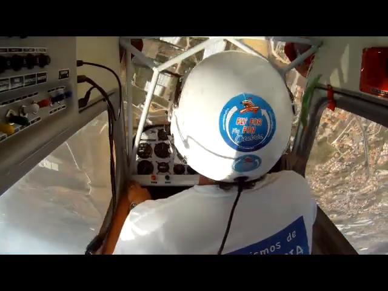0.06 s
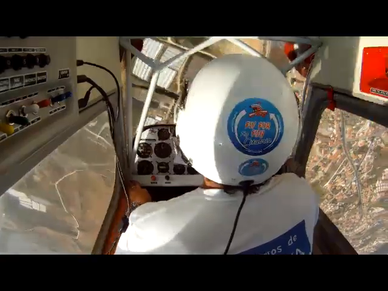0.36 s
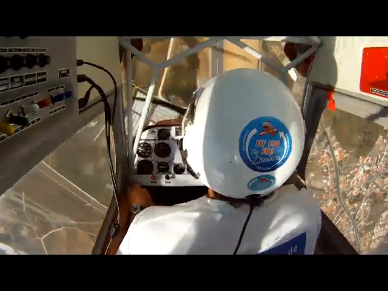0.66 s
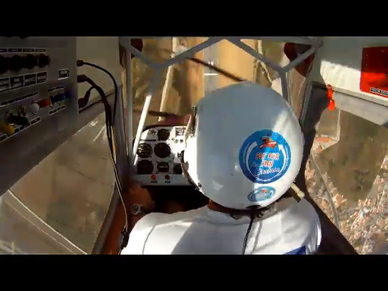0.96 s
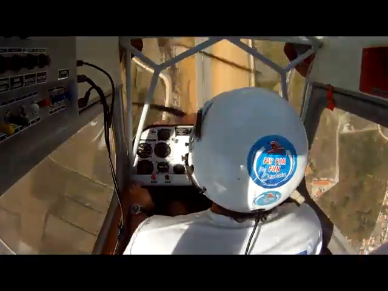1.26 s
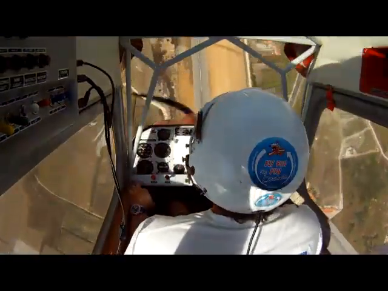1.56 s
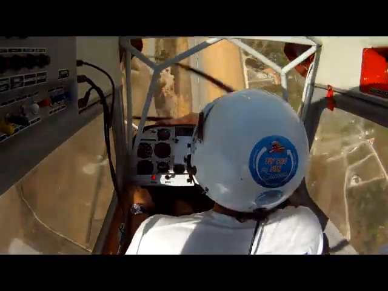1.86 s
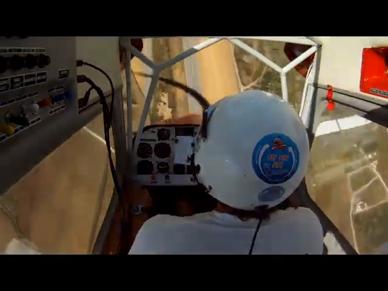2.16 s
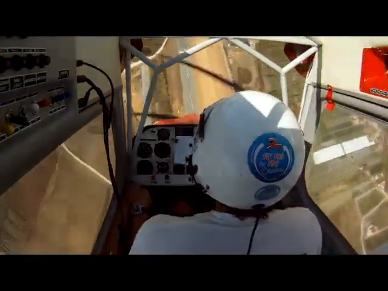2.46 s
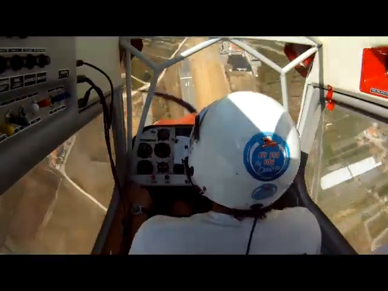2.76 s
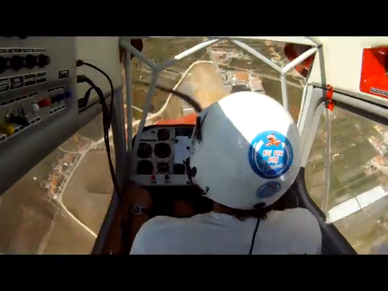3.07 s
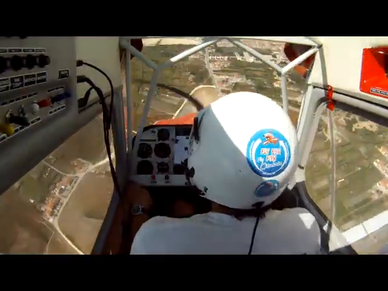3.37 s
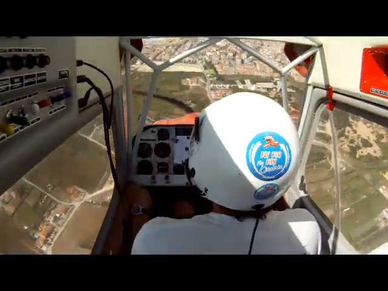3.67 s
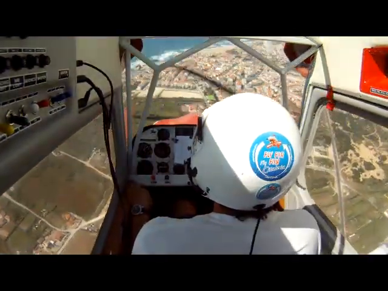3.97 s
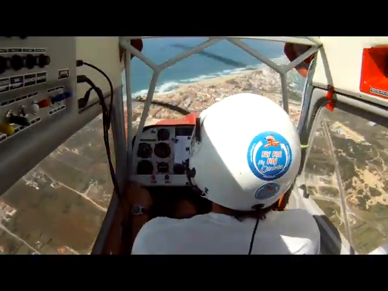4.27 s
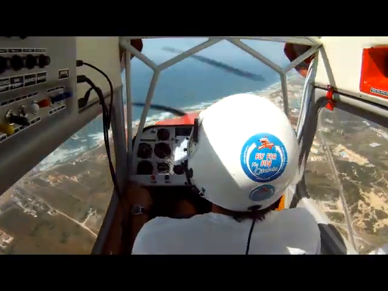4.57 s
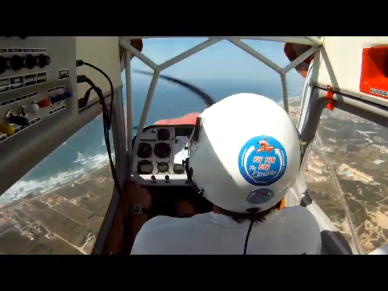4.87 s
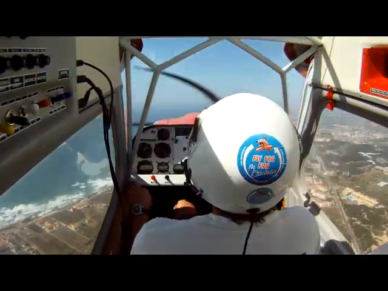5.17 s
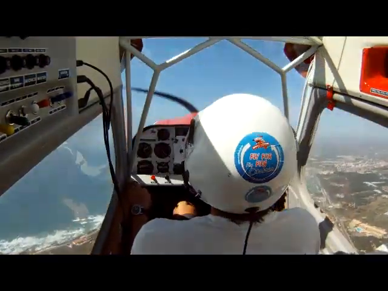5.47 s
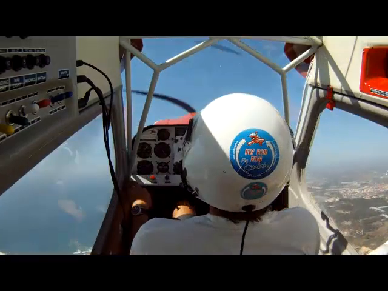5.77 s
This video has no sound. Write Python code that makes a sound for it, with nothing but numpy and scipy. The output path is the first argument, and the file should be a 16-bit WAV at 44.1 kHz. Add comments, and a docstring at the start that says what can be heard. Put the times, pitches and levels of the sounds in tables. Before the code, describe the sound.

Inside the cabin of a small plane in flight, a loud, deep propeller drone mixes with an uneven exhaust beat and a faint engine clatter. The engine gradually gains speed, so its pitch edges upward before levelling off. Wind buffets and hisses around the canopy throughout, surging lightly early on and again near the end. The sound is close, with a slight sizzle from a small camera's microphone.

```python
"""A loud propeller drone in rushing air, heard in the cockpit of a light aircraft pulling out of a dive.
A four-cylinder four-stroke turns the two-blade propeller, slowly gaining speed: blade and firing tones
sound over the uneven beat of the exhaust and a faint clatter in the cowling. The gusting slipstream
buffets the cabin and hisses through its gaps. A small camera's slow converter holds each sample,
which adds a thin sizzle on top."""
import sys
import numpy as np
from scipy import signal
from scipy.fft import rfft, irfft
from scipy.io import wavfile

SR = 44100
rng = np.random.default_rng(int(sys.argv[2]) if len(sys.argv) > 2 else 0)


def store_pcm(level_fs):
    """Save levels as 16-bit WAV."""
    pcm = np.round(np.clip(level_fs, -1, 1) * 32767).astype(np.int16)
    wavfile.write(sys.argv[1], SR, np.atleast_2d(pcm).T)


N = 260631
TIME = np.arange(N) / SR
BIN_HZ = np.maximum(np.arange(N // 2 + 1) * SR / N, 1)


def from_db(db):
    """Decibels to gain."""
    return 10 ** (np.asarray(db) / 20)

def unit_rms(x):
    """Scale to rms 1."""
    return x / np.sqrt(np.mean(x ** 2) + 1e-20)

def envelope(points):
    """Straight ramps between breakpoints, a value for every sample."""
    return np.interp(TIME, *np.transpose(points))

def equalise(x, gain):
    """Filter by a gain for every frequency."""
    return irfft(rfft(x) * gain, N)

def noise(gain):
    """Filtered noise, rms 1."""
    return unit_rms(equalise(rng.standard_normal(N), gain))

def band_noise(eq):
    """Noise through an EQ curve that falls steeply beyond its ends, rms 1."""
    hz, db = np.transpose(eq)
    skirts = np.minimum(1, BIN_HZ / hz[0]) * np.minimum(1, hz[-1] / BIN_HZ)
    return noise(from_db(np.interp(np.log(BIN_HZ), np.log(hz), db)) * skirts ** 4)

def bell(hz, centre_hz, width_hz):
    """A resonance peak of height 1, its width taken at half height."""
    return 1 / (1 + (2 * (hz - centre_hz) / width_hz) ** 2)

def drift(rate_hz):
    """Slow random modulation with a spread of 1, rolling off above rate_hz."""
    hz = np.arange(2049) / 8
    slow = irfft(rfft(rng.standard_normal(4096)) / (1 + (hz / rate_hz) ** 2))
    return np.interp(TIME, np.arange(4096) / 512, unit_rms(slow))

def throb(turns, blade_depth, cycle_depth):
    """Tremolo: prop wash swells with each blade, engine clatter with each four-stroke cycle."""
    cycle = np.cos(np.pi * turns) + 0.61 * np.cos(2 * np.pi * turns)
    return 1 + blade_depth * np.cos(2 * np.pi * 2 * turns) + cycle_depth * cycle


# The cowling's hollow ring, as an EQ curve: f/Hz, level/dB
COWLING_EQ = [(500, -10), (600, -8), (690, -2.5), (760, -1), (850, -6), (1000, -27)]
def cowling_clatter(turns, revs):
    """Combustion clatter rings in the cowling, loudest while the engine labours at low speed."""
    gain = from_db(-46.5 - 9.5 * revs)
    return gain * band_noise(COWLING_EQ) * throb(turns, blade_depth=0.2, cycle_depth=0.088)

# Strength of the airflow over the canopy: t/s, level/dB
AIRFLOW = [(0, -33), (0.06, -38.0), (0.56, -36), (0.62, -38.5), (0.95, -39.5), (1.05, -34), (1.4, -35.5),
           (1.5, -32.5), (1.68, -36.5), (1.75, -36), (2.45, -37.5), (2.9, -35.5), (3.5, -36), (3.75, -39),
           (4.9, -38.6), (5.22, -33), (5.62, -34.5), (5.68, -37.0), (5.91, -39.1)]
def gusts(usual_flow_db):
    """The airflow surges and slackens, in dB above its usual strength."""
    return envelope(AIRFLOW) - usual_flow_db

# Air squeezing through gaps, as an EQ curve: f/Hz, level/dB
HISS_EQ = [(600, -2.5), (1000, -3), (1210, 1), (1550, 0.5), (1900, -3.5), (2130, -1), (2400, 0.5),
           (2750, 0), (3150, -2.5), (3550, -6), (3950, -7), (4250, -11.5), (4700, -9), (5600, -14.5)]
# Ringing panels and frame tubes, relative to the hiss: f/Hz, width/Hz, level/dB
PANEL_MODES = [(1195, 65, -16), (1640, 45, -28), (2127, 120, -11.5), (2644, 16, -15.5), (3078, 56, -16),
               (4670, 70, -29)]
def gap_hiss(turns, gust_db):
    """Air hisses through the cabin's gaps and sets panels ringing."""
    rings = sum(from_db(db) * noise(bell(BIN_HZ, hz, width)) for hz, width, db in PANEL_MODES)
    gain = from_db(-36.5 + gust_db + 0.75 * drift(24))
    return gain * (band_noise(HISS_EQ) + rings) * throb(turns, blade_depth=0.022, cycle_depth=0.023)

# Low end of the shaking cabin skin, as an EQ curve: f/Hz, level/dB
RUMBLE_EQ = [(15, -8), (25, -18), (35, -23), (48, -14), (58, 2), (80, -0.5), (100, 2), (125, -7), (150, -2)]
def skin_rumble(gust_db):
    """Air shakes the cabin skin: a deep rumble that swells in gusts."""
    return from_db(-28.5 + 1.4 * gust_db + 1.5 * drift(3.7)) * band_noise(RUMBLE_EQ)

# Low-mid body of the buffeting, as an EQ curve: f/Hz, level/dB
BUFFET_EQ = [(110, -18), (138, -2), (160, -1), (205, 2.5), (250, -0.5), (295, 2.5), (330, -3.5), (390, -19)]
def cabin_buffet(gust_db, revs):
    """The slipstream beats on the cabin, harder in gusts and as the speed builds."""
    return from_db(-29 + 1.13 * gust_db + 1.4 * revs) * band_noise(BUFFET_EQ)

# Midrange of the air around the canopy, as an EQ curve: f/Hz, level/dB
ROAR_EQ = [(280, -26), (345, -1.5), (380, 2.5), (470, -0.5), (550, -4.5), (620, -10.5), (700, -12),
           (770, -18), (900, -21.5), (1300, -36.5)]
# Fader ride of the roar, before its trim: t/s, level/dB
ROAR_RIDE = [(0, -29), (0.85, -32), (1.15, -28), (1.75, -28.6), (2.4, -28.5), (3.35, -24), (3.8, -28),
             (4.85, -29), (5.42, -22), (5.91, -29)]
def canopy_roar(turns, trim_db):
    """Air roars around the canopy, pulsing lightly with the prop wash."""
    gain = from_db(envelope(ROAR_RIDE) + trim_db + 1.06 * drift(12))
    return gain * band_noise(ROAR_EQ) * throb(turns, blade_depth=0.04, cycle_depth=0.036)

# Exhaust partials, before their trim: multiple of crank speed, low-rev level/dB, high-rev level/dB
EXHAUST_PARTIALS = [(1.5, -36, -36.5), (2.5, -38, -39.5), (3, -35, -38.5), (3.5, -30.5, -51.5),
                    (4.5, -37.5, -35), (5, -41.5, -42), (5.5, -45, -40), (6.5, -37.5, -35), (7, -44.5, -36),
                    (7.5, -42, -37.5), (8.5, -39, -45), (9, -54, -41.5), (9.5, -45, -39),
                    (10, -48.5, -42.5), (10.5, -63, -52), (11, -46.5, -43.5), (11.5, -44.5, -39),
                    (12, -34, -51.5), (13, -51, -42), (13.5, -43.5, -78), (14, -42, -66), (14.5, -61, -89),
                    (15, -55, -47.5), (15.5, -44, -46), (16, -57, -48), (17, -46, -78), (17.5, -43, -61),
                    (18.5, -48, -83)]
def exhaust(turns, revs, trim_db, waver):
    """Unequal cylinders repeat their beat every two turns; cabin resonances recolour it as revs rise."""
    beat = 0
    for order, low_rev_db, high_rev_db in EXHAUST_PARTIALS:
        phase = 2 * np.pi * (order * turns + rng.random()) + waver * drift(6.5)
        gain = from_db(low_rev_db + (high_rev_db - low_rev_db) * revs)
        beat += gain * (1 + waver * drift(6.6)) * np.cos(phase)
    return np.sqrt(2) * from_db(trim_db) * beat

# Fader rides of the crank's shake, the blade tone and its octave, before their trims: t/s, level/dB
SHAKE_RIDE = [(0, -23.5), (0.3, -23.0), (0.55, -34), (0.85, -33.6), (1.08, -22), (1.8, -27.1), (2.05, -36),
              (2.6, -36.5), (2.95, -26.2), (4.1, -31.8), (5.3, -24.5), (5.91, -28)]
BLADE_RIDE = [(0, -21.5), (0.3, -17.5), (0.85, -15.5), (1.4, -20), (1.65, -16.5), (2.4, -14.8), (3.25, -18),
              (3.8, -14.5), (4.6, -15.5), (5.1, -18.5), (5.25, -26.5), (5.4, -21), (5.91, -16)]
OCTAVE_RIDE = [(0, -24.5), (0.45, -30.5), (0.6, -40), (1.15, -32), (1.5, -25.5), (2.35, -37.1), (3.25, -22),
               (4, -33.5), (4.8, -28), (5.25, -21.4), (5.7, -20.5), (5.91, -30.5)]
# Overtones that harden in gusts: multiple of crank speed, base level/dB, swell/(dB per dB of gust)
OVERTONES = [(6, -33.5, 1), (8, -38, 1.3)]
# Cabin resonances that lift the overtones gliding through them: f/Hz, width/Hz, boost/dB
CABIN_MODES = [(240.2, 7.8, 8.5), (255.3, 12.5, 4), (314.3, 12, 8)]
def propeller_drone(turns, speed, gust_db):
    """Blade passes and firings come twice a turn; their harmonics line up in a sharp pressure trough."""
    partials = []
    for order, ride, trim_db in (1, SHAKE_RIDE, 0.3), (2, BLADE_RIDE, 0.05), (4, OCTAVE_RIDE, 0.73):
        partials.append((order, envelope(ride) + trim_db + 0.37 * drift(1.8)))
    for order, base_db, swell in OVERTONES:
        lift_db = sum(boost * bell(order * speed, hz, width) for hz, width, boost in CABIN_MODES)
        partials.append((order, base_db + lift_db + swell * gust_db + 2.0 * drift(3.7)))
    return -np.sqrt(2) * sum(from_db(db) * np.cos(2 * np.pi * order * turns) for order, db in partials)

def crank(slow_hz, fast_hz, start_s, end_s):
    """The engine winds up in one smooth swing: turns made, turns per second and revs from 0 to 1."""
    progress = np.clip((TIME - start_s) / (end_s - start_s), 0, 1)
    revs = np.sin(np.pi / 2 * progress) ** 2
    speed = slow_hz + (fast_hz - slow_hz) * revs
    turns = np.cumsum(speed * (1 + 0.00053 * drift(5.9))) / SR
    return turns, speed, revs


def scene():
    """The mono mix: one crankshaft times every tone and throb, one airflow drives the gusts."""
    turns, speed, revs = crank(slow_hz=38.75, fast_hz=44.7, start_s=0.47, end_s=5.1)
    gust_db = gusts(usual_flow_db=-36.5)
    engine = propeller_drone(turns, speed, gust_db)
    engine += exhaust(turns, revs, trim_db=-1.24, waver=0.31)
    engine += cowling_clatter(turns, revs)
    air = skin_rumble(gust_db) + cabin_buffet(gust_db, revs)
    air += canopy_roar(turns, trim_db=-0.56) + gap_hiss(turns, gust_db)
    return (engine + air)[None]

def sample_and_hold(x, rate_hz, edge_hz, floor_db):
    """The converter cuts the highs and adds faint hiss; its held steps mirror the band around its rate."""
    hiss = from_db(floor_db) * noise(BIN_HZ < rate_hz / 2)
    band = equalise(x, 1 / np.sqrt(1 + (BIN_HZ / edge_hz) ** 36)) + hiss
    steps = np.diff(band, prepend=band[:, :1])
    mirrored = steps * 2 * np.cos(2 * np.pi * rate_hz * TIME)
    sizzle = signal.lfilter([1], [1, -0.6], mirrored)
    return band + from_db(-1.76) * sizzle

def record(dry):
    """Fades of 2 ms at both ends, the converter's sizzle, then a steep high cut."""
    fades = np.minimum(1, np.minimum(TIME, TIME[::-1]) / 0.002)
    held = sample_and_hold(dry * fades, rate_hz=12000, edge_hz=5345, floor_db=-60)
    high_cut = signal.ellip(12, 0.1, 90, 15350, fs=SR, output="sos")
    return signal.sosfilt(high_cut, held)


dry = scene()
out = record(dry)
store_pcm(out)
```